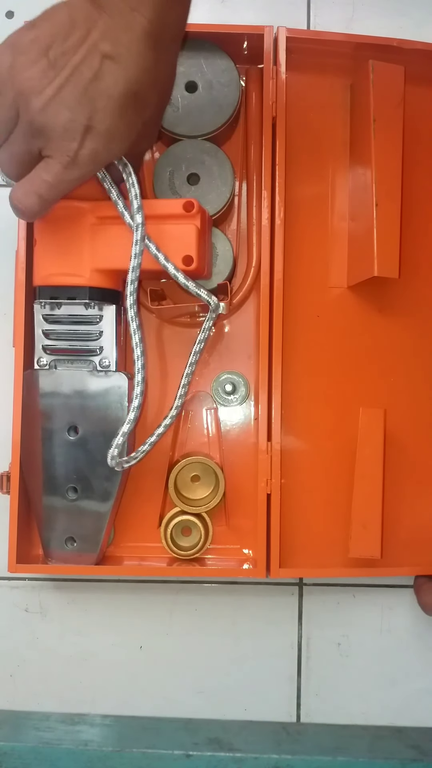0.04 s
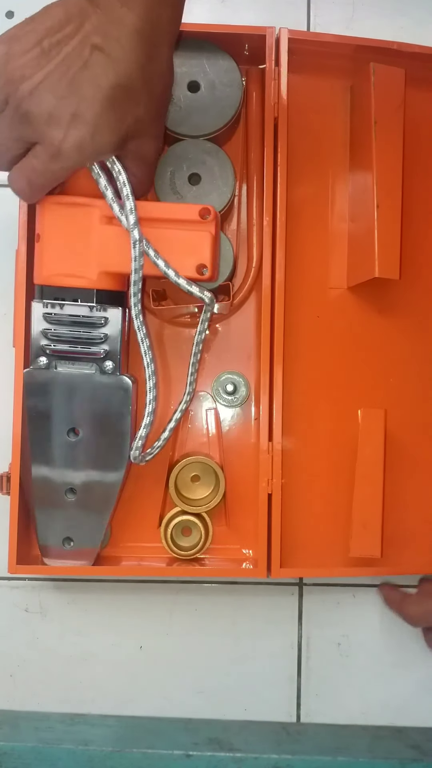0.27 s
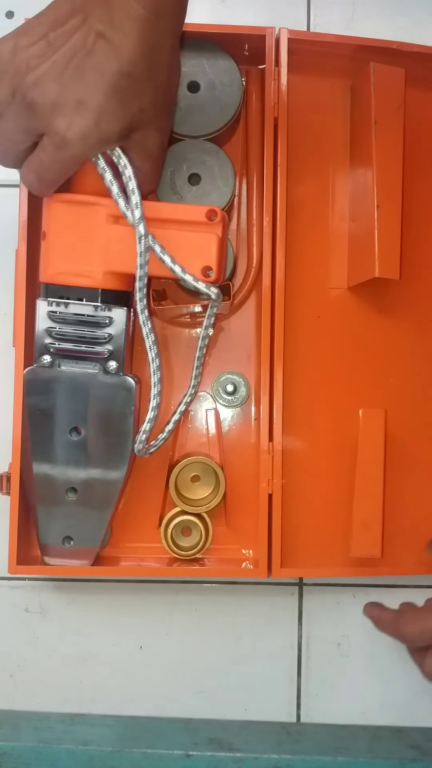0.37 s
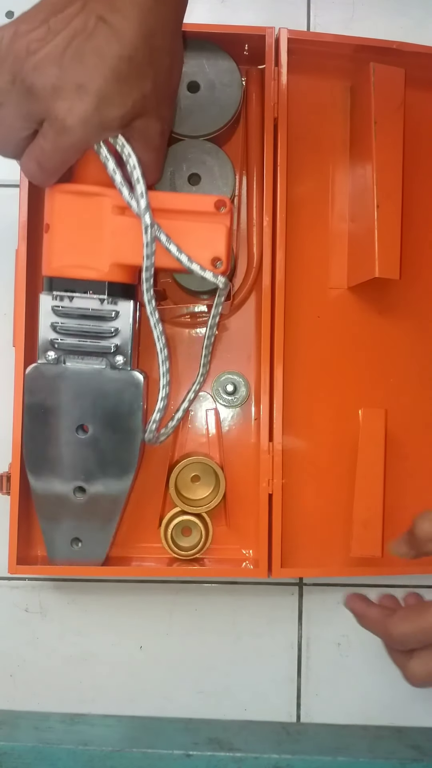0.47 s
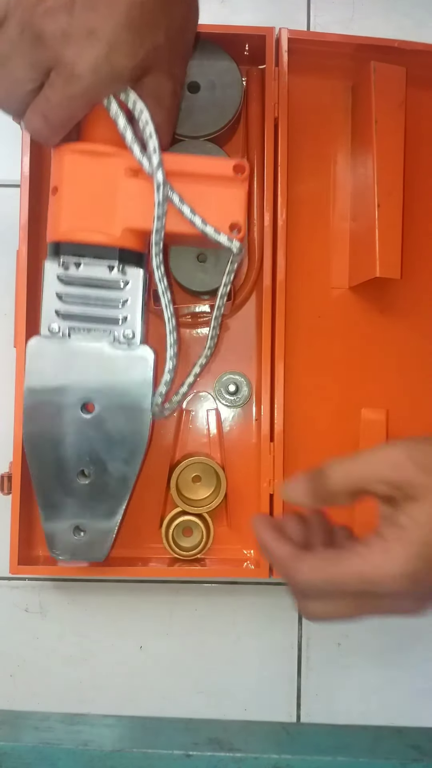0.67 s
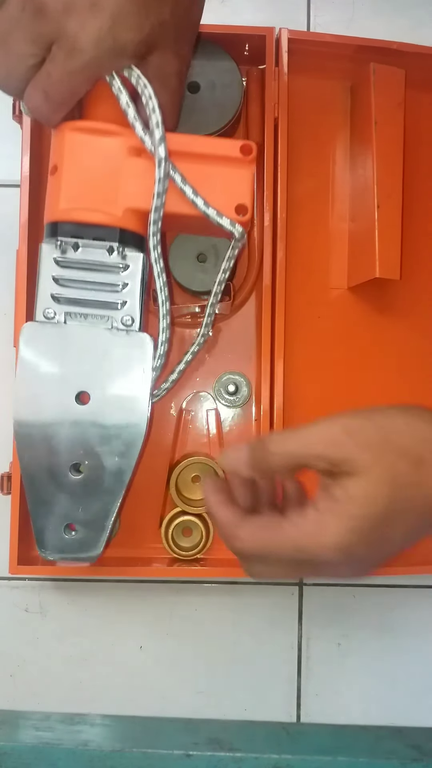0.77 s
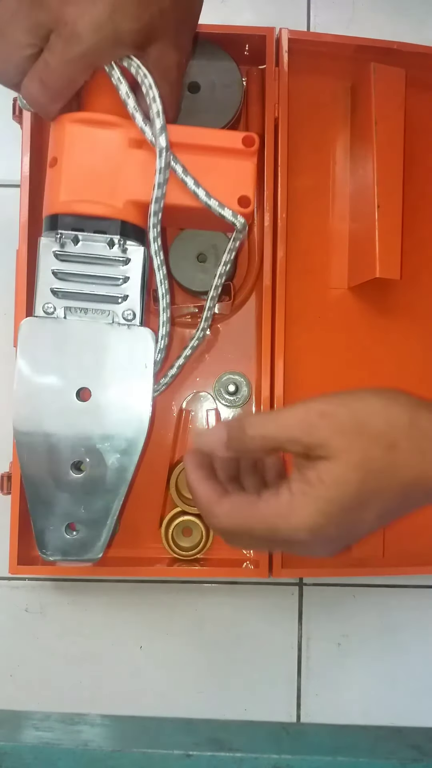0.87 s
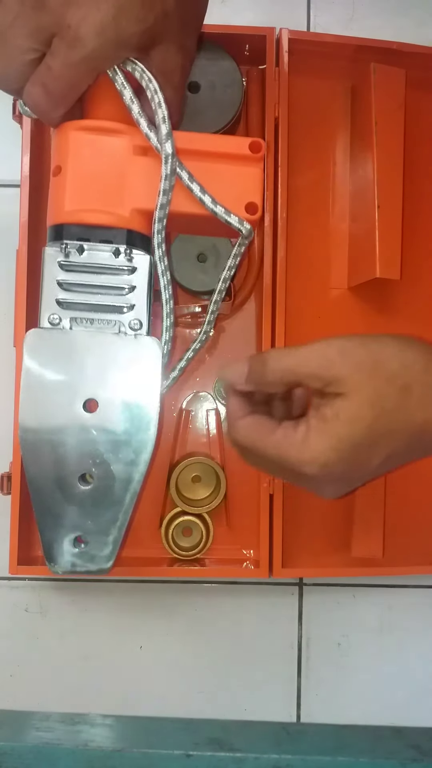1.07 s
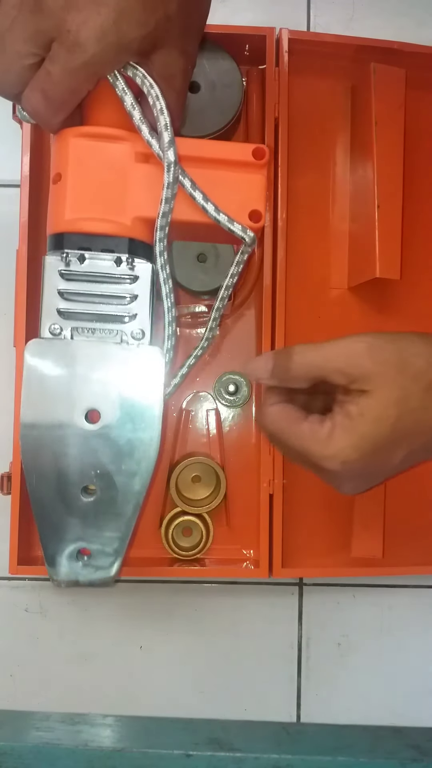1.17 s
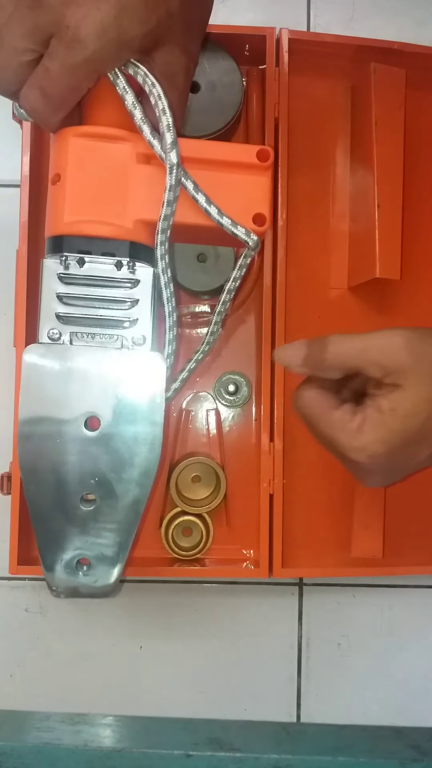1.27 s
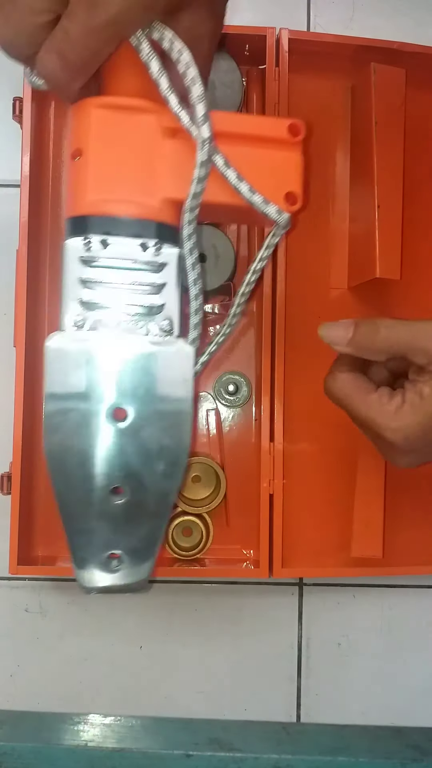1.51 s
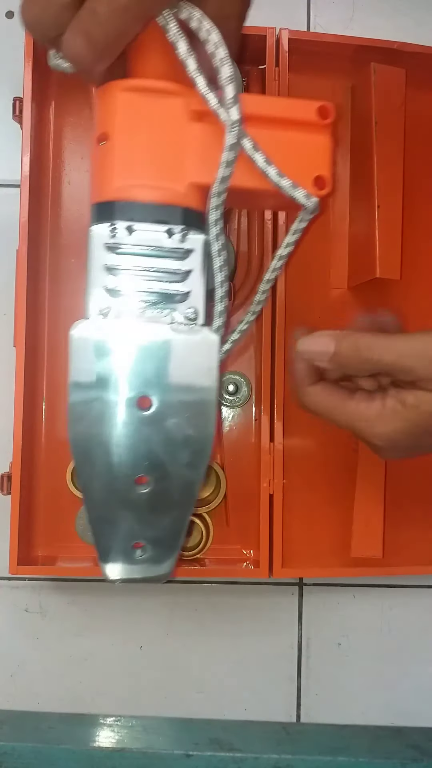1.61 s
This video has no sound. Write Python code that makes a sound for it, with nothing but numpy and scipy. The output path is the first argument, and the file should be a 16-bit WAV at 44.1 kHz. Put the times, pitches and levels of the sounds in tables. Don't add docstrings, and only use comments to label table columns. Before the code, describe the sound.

A metal tool clatters and knocks as it is lifted out of a hollow case indoors

```python
import sys
import numpy as np
from scipy import signal
from scipy.fft import rfft, irfft, next_fast_len
from scipy.io import wavfile
from scipy.ndimage import uniform_filter1d

SR = 44100
rng = np.random.default_rng(int(sys.argv[2]) if len(sys.argv) > 2 else 0)


def wav_record(signal):
    frames = np.transpose(np.atleast_2d(signal))
    bounded = np.clip(frames, -1, 1)
    quanta = np.round(bounded * 32767).astype(np.int16)
    wavfile.write(sys.argv[1], SR, quanta)


def boost_factor(decibels):
    exponent = np.asarray(decibels, float) / 20
    return 10 ** exponent


N = 72765
POSITIONS = 4


def unit(x):
    return x / np.sqrt(np.mean(x ** 2) + 1e-30)


def colour(x, points):
    size = next_fast_len(2 * x.shape[-1])
    curve = np.array(points, float)
    hz = np.maximum(np.arange(size // 2 + 1) * SR / size, 1)
    gain = boost_factor(np.interp(np.log(hz), np.log(curve[:, 0]), curve[:, 1]))
    return irfft(rfft(x, size) * gain, size)[..., :x.shape[-1]]


def band(x, lo_hz, hi_hz):
    edges = [lo_hz, min(hi_hz, .45 * SR)]
    return signal.sosfilt(signal.butter(2, edges, "band", fs=SR, output="sos"), x)


def add(out, x, at_s):
    i = int(at_s * SR)
    out[i:i + len(x)] += x[:len(out) - i]


def decay(t, t60):
    return np.exp(-np.log(1000) * t / t60)


def walk(rate):
    k = int(SR / rate)
    steps = np.repeat(rng.standard_normal(N // k + 1), k)
    return 1.8 * uniform_filter1d(uniform_filter1d(steps, k), k)[:N]


def hum():
    # pitch_hz, level_db (per Hz)
    spectrum = [(30, -36), (64, -8), (150, -4), (300, -8.5), (500, -10.5), (1000, -13), (3000, -15),
                (16000, -27.5)]
    level_db, swell_db, flicker_db = -42.5, .8, 1.
    out, swell = 0, walk(4.06)
    for hz in 32 * 2. ** np.arange(0, 9.5, .5):
        depth = np.clip(300 / hz, .3, 1)
        wobble_db = depth * (swell_db * swell + flicker_db * walk(12))
        out = out + boost_factor(wobble_db) * band(rng.standard_normal(N), hz / 1.2, hz * 1.2)
    return boost_factor(level_db) * unit(colour(out, spectrum))


def old_ring():
    # pitch_hz, level_db, t60_s
    tones = [
        (1850, -46, .6),
        (296, -46, .4),
    ]
    t = np.arange(N) / SR
    return sum(boost_factor(db) * np.sin(2 * np.pi * hz * t) * decay(t, t60) for hz, db, t60 in tones)


def clicks(size):
    per_s, scatter_db = 11000, 2
    chance, sign, strength = rng.random((3, size))
    hits = chance < per_s / SR
    return unit(hits * np.sign(sign - .5) * boost_factor(-scatter_db * np.log(1 - strength)))


def chatter(length_s, size=4096):
    rise_s = .0035
    t = np.arange(size) / SR
    return clicks(size) * (1 - np.exp(-t / rise_s)) * np.exp(-t / max(length_s, .001))


def ring(modes, crack, crack_db, size=8192):
    scatter_db, detune = 2.5, .01
    t = np.arange(size) / SR
    hz, db, t60 = np.array(modes, float).T[:, :, None]
    level_luck, pitch_luck = rng.standard_normal((2, len(modes), 1))
    tones = boost_factor(db + scatter_db * level_luck) * np.sin(2 * np.pi * hz * (1 + detune * pitch_luck) * t)
    sign = (-1) ** np.arange(len(modes))[:, None]
    tones = np.sum(sign * tones * decay(t, t60), axis=0)
    snap = band(np.arange(size) == 0, *crack)
    return (unit(tones) + boost_factor(crack_db) * unit(snap)) / np.sqrt(size)


def parts(rib_db, metal_db):
    # pitch_hz, level_db, t60_s
    rib_modes = [(1340, -3, .04), (1590, -2, .04), (1730, -2, .04), (1860, 0, .045), (2140, 0, .04),
                 (2300, -1, .04), (2430, -1, .04), (2570, -1, .04), (2760, 0, .045), (3040, -2, .035),
                 (3230, -1, .035), (3500, -3, .03), (3760, -2, .03)]
    # pitch_hz, level_db, t60_s
    metal_modes = [(4050, -2, .04), (4450, -4, .03), (4650, -4, .03), (5330, -1, .035), (5750, -3, .04),
                   (6350, -4, .03), (6870, -4, .035), (7150, -5, .03), (7500, -5, .025), (10120, -4, .025),
                   (12500, -5, .02)]
    ribs = boost_factor(rib_db - 1) * ring(rib_modes, (1250, 4400), crack_db=11)
    metal = boost_factor(metal_db - 1.5) * ring(metal_modes, (3900, 16000), crack_db=12)
    return ribs - metal


def contacts(tracks):
    # start_s, rib_level_db, metal_level_db, chatter_length_s
    touches = [(.150, -31.5, -38, 0.013), (.226, -35.5, -26, 0.0091), (.237, -26.5, -66, 0.013),
               (.249, -34, -35, 0.014), (.271, -36.5, -32.5, 0.011), (.292, -58, -47, 0.004),
               (.364, -44, -63, 0.0051), (.380, -42, -69, 0.0069), (.413, -46, -57, 0.02),
               (.460, -26.5, -40, 0.016), (.472, -22, -47, 0.0085), (.494, -42, -28.5, 0.014),
               (.516, -27, -21, 0.0072), (.526, -40, -26, 0.013), (.540, -25, -21.5, 0.0063),
               (.554, -22, -18, 0.013), (.576, -16.5, -42, 0.01), (.597, -30, -52, 0.023),
               (.620, -13, -14, 0.0045), (.629, -12, -14, 0.005), (.655, -18, -47, 0.005),
               (.718, -35, -28.5, 0.0091), (.738, -35, -53, 0.019), (.783, -46, -45.5, 0.014),
               (.805, -28, -62, 0.0035), (.945, -35, -52, 0.0087), (.953, -30.5, -52, 0.0048)]
    for k, (start_s, rib_db, metal_db, length_s) in enumerate(touches):
        touch = signal.fftconvolve(chatter(length_s), parts(rib_db, metal_db))
        add(tracks[k % POSITIONS], touch, start_s)


def ping(hz, db, t60, rise_s, size=16384):
    t = np.arange(size) / SR
    return boost_factor(db) * np.sin(2 * np.pi * hz * t) * decay(t, t60) * (1 - np.exp(-t / rise_s))


def latch_pings(track):
    # start_s, pitch_hz, level_db, t60_s
    strikes = [(.1505, 7600, -16, 0.012), (0.15, 10150, -21, 0.024), (0.15, 5370, -19, 0.044),
               (.158, 6600, -36, 0.18), (0.15, 4040, -25, 0.058), (0.15, 3280, -34, .08),
               (0.38, 5700, -26, 0.023), (0.42, 4400, -37, 0.022), (.380, 3000, -33, 0.07),
               (0.27, 4900, -25, .1), (0.24, 7180, -18.5, 0.015), (0.25, 2640, -28, .05),
               (0.48, 7260, -19, 0.023), (.540, 8200, -10, 0.023), (0.62, 10300, -28, .04)]
    for start_s, hz, db, t60 in strikes:
        add(track, ping(hz, db, t60, rise_s=0.00026), start_s)


def edge_ticks(tracks):
    # start_s, level_db, pitch_hz
    catches = [(.1517, -22, 7500), (.1541, -27, 1800), (.1567, -22, 5300), (.2276, -25, 7100),
               (.2441, -20, 2100), (.2961, -28, 2200), (.3347, -32, 2200), (.3814, -34, 2900),
               (.3931, -34, 2700), (.4159, -34, 2800), (.4207, -34, 2200), (.4648, -19, 1800),
               (.4755, -14, 2300), (.4789, -21, 3900), (.4961, -20, 5100), (.5017, -20, 3500),
               (.5609, -10, 1500), (.5685, -11, 1100), (.5785, -13, 4200), (.6015, -15, 2300),
               (.6138, -14, 1300), (.6215, -11, 5100), (.6292, -11, 5000), (.6345, -11, 2600),
               (.6525, -14, 2900), (.6615, -16, 2800), (.7458, -21, 1700), (.7855, -25, 2200),
               (.8417, -30, 1500), (.9455, -34, 1700), (.9535, -28, 4000), (.9576, -31, 3800),
               (.9602, -25, 2800), (.9899, -35, 2600), (1.0095, -37, 2600)]
    for k, (start_s, db, hz) in enumerate(catches):
        tick = ping(hz, db + 2, 10 / hz, rise_s=0.0001, size=2048)
        add(tracks[k % POSITIONS], tick, start_s)


def thump(db, hz, length_s):
    # pitch_hz, level_db, t60_s
    body_modes = [(225, -6, .06), (290, -6, .05), (422, -4, .05), (487, -2, .045), (565, -2, .045),
                  (644, -2, .08), (760, -2, .05), (842, 0, .07), (964, -1, .05), (1166, -2, .045),
                  (1225, -2, .045), (1319, -1, .06)]
    body_db, chatter_db, push, spot_octaves = -4, -7, 14, .38
    modes = []
    for f, g, t60 in body_modes:
        octaves_off = np.log2(f / hz) / spot_octaves
        modes.append((f, g - 6 * octaves_off ** 2, t60))
    blow = boost_factor(chatter_db) * chatter(length_s)
    blow[0] += push
    shell = ring(modes, (hz / 1.7, hz * 1.76), crack_db=-5)
    return boost_factor(db + body_db) * signal.fftconvolve(blow, shell)


def thumps(tracks):
    # start_s, level_db, favoured_pitch_hz, chatter_length_s
    blows = [(.156, -30, 1160, 0.048), (.228, -26.5, 633, 0.0071), (.244, -24.5, 640, 0.0043),
             (.255, -25, 790, 0.0065), (.300, -46, 660, 0.0071), (.365, -61, 580, 0.0077),
             (.428, -34, 700, 0.054), (.464, -24, 524, 0.063), (.492, -19.5, 760, 0.015),
             (.524, -18.5, 497, 0.011), (.540, -18, 646, 0.0022), (.553, -14.5, 950, 0.0038),
             (.556, -10.5, 1130, 0.011), (.567, -14, 937, 0.0034), (.583, -25.5, 274, 0.012),
             (.582, -17.5, 1020, 0.04), (.597, -16, 770, 0.027), (.608, -35, 860, 0.0047),
             (.629, -17.5, 650, 0.011), (.654, -23, 1320, 0.003), (.682, -29, 643, 0.0041),
             (.718, -27, 476, 0.0054), (.729, -21, 650, 0.0074), (.750, -35, 425, 0.0082),
             (.778, -28, 670, 0.012), (.808, -33, 633, 0.0033), (.856, -42, 606, 0.0058)]
    for k, (start_s, db, hz, length_s) in enumerate(blows):
        add(tracks[k % POSITIONS], thump(db, hz, length_s), start_s)


def shell_rings(track):
    # start_s, pitch_hz, level_db, t60_s
    left_ringing = [(.228, 576, -27, 0.13), (.243, 494, -27.5, 0.098), (.247, 773, -23.5, 0.11),
                    (.254, 626, -33, 0.24), (.288, 733, -32, 0.073), (.466, 562, -48, .08),
                    (.468, 1268, -26, 0.19), (.498, 846, -39, 0.13), (.524, 610.6, -17.5, .11),
                    (.552, 1320, -15, 0.064), (.556, 954, -11, 0.076), (.558, 497, -12, 0.06),
                    (.590, 873, -11, 0.035), (.603, 862, -17, 0.13), (.630, 650, -12.5, 0.043),
                    (.649, 1343, -11.5, 0.052), (.692, 624, -34, 0.053), (.717, 580, -11.5, 0.039),
                    (.720, 294, -27, 0.042), (.721, 870, -23.5, 0.17), (.730, 646.4, -20.5, 0.11),
                    (.750, 416.7, -22.5, 0.081), (.782, 672, -39, .12), (.807, 650, -26, 0.11),
                    (.858, 633, -29.5, 0.05), (.953, 1665, -32, 0.043), (.953, 3770, -24.5, 0.036),
                    (.955, 2210, -30, 0.052), (.957, 2748, -26, 0.056)]
    for start_s, hz, db, t60 in left_ringing:
        add(track, ping(hz, db, t60, rise_s=.002), start_s)


def drag():
    # start_s, pressure_db
    pressure = [
        (0.451, -39),
        (0.466, -36.5),
        (.51, -24.5),
        (.56, -20),
        (.61, -25),
        (.66, -50),
        (.72, -38),
        (0.798, -39),
        (.88, -63),
    ]
    time_s, pressure_db = np.array(pressure).T
    force_db = np.interp(np.arange(N) / SR, time_s, pressure_db, left=-120, right=-120)
    force = clicks(N) * boost_factor(force_db)
    return signal.fftconvolve(force, parts(rib_db=-8.0, metal_db=-48))[:N]


def far_boom(track):
    # start_s, pitch_hz, level_db, length_s
    boom = (1.40, 297, -47, .11)
    start_s, hz, db, length_s = boom
    t = np.arange(N) / SR
    swell = np.sin(np.pi * np.clip(t / length_s, 0, 1))
    add(track, boost_factor(db) * np.sin(2 * np.pi * hz * t) * swell, start_s)


def case():
    tracks = np.zeros((POSITIONS + 1, N))
    add(tracks[0], old_ring(), 0)
    contacts(tracks)
    latch_pings(tracks[-1])
    edge_ticks(tracks)
    thumps(tracks)
    shell_rings(tracks[-1])
    add(tracks[3], drag(), 0)
    far_boom(tracks[2])
    return band(tracks, 115, 24000)


def room(x):
    # pitch_hz, t60_s
    decay_curve = [(200, 0.91), (700, 0.58), (2000, 0.45), (5000, 0.28), (12000, 0.32)]
    level_db, gap_s, build_s = -3.5, 0.0055, 0.00075
    t, curve, tail = np.arange(SR) / SR, np.array(decay_curve), 0
    for hz in 90 * 2. ** np.arange(8):
        t60 = np.interp(np.log(hz), np.log(curve[:, 0]), curve[:, 1])
        octave = band(rng.standard_normal(SR), hz / np.sqrt(2), hz * np.sqrt(2))
        tail = tail + octave * decay(t, t60)
    tail = tail * (1 - np.exp(-np.maximum(t - gap_s, 0) / build_s))
    return x + boost_factor(level_db) * signal.fftconvolve(x, unit(tail) / np.sqrt(SR))[:N]


def scene():
    to_walls = 0.45
    *spread, rings = case()
    spread[1] = spread[1] + to_walls * rings
    in_room = sum(room(x) for x in spread)
    return (in_room + (1 - to_walls) * rings + hum())[None]


def band_limit(x):
    return signal.sosfilt(signal.butter(12, 16660, fs=SR, output="sos"), x)


def record(dry):
    # pitch_hz, level_db
    mic_curve = [(30, 8), (6000, -5.5), (7500, -3.5), (8100, -10), (8800, -20), (9500, -17), (12500, -15.5),
                 (15800, -15), (16400, -50)]
    return band_limit(colour(dry, mic_curve))


dry = scene()
out = record(dry)
wav_record(out)
```